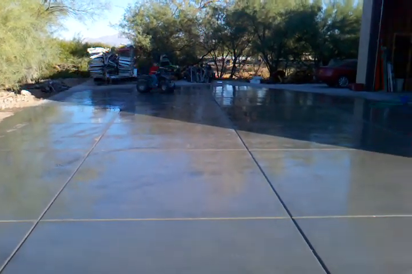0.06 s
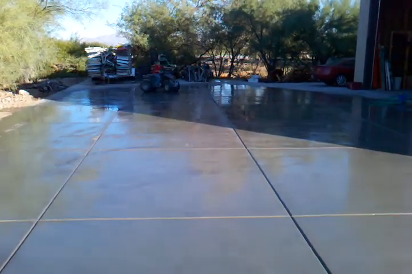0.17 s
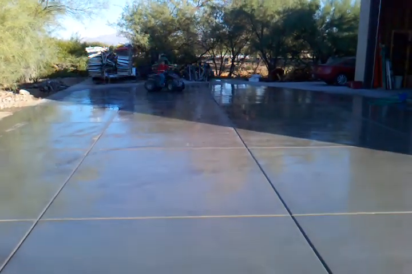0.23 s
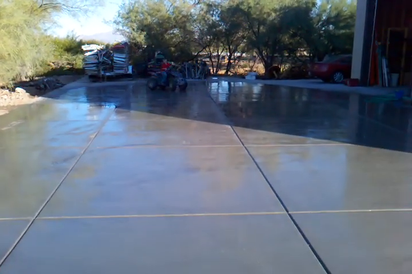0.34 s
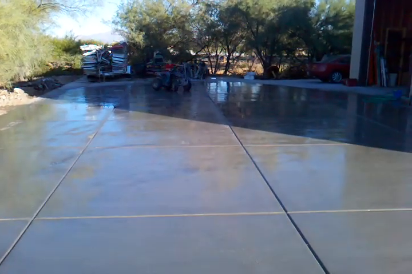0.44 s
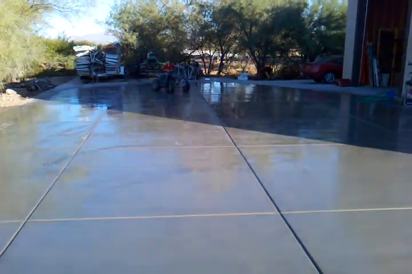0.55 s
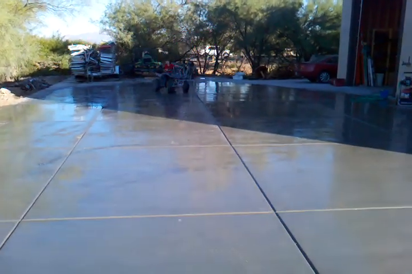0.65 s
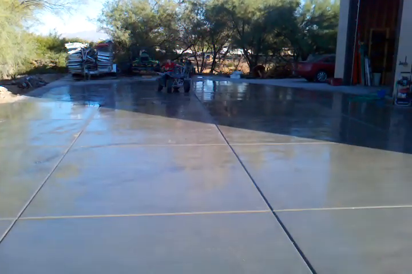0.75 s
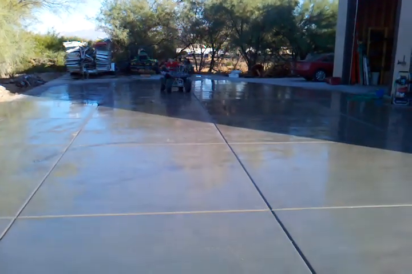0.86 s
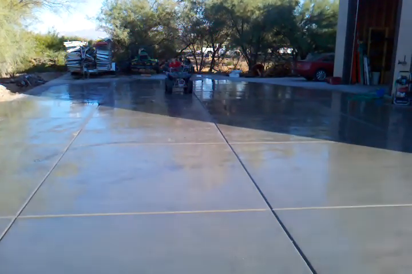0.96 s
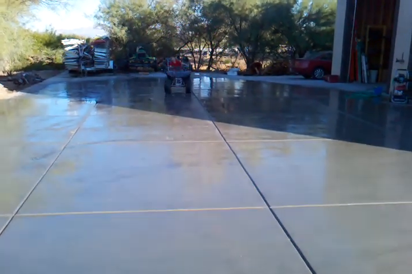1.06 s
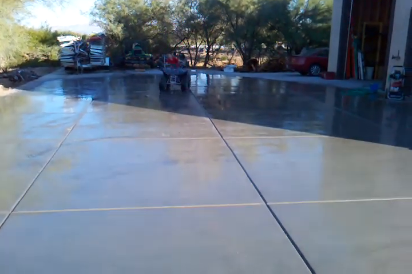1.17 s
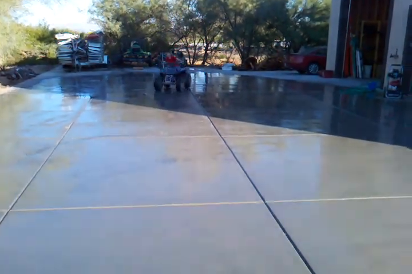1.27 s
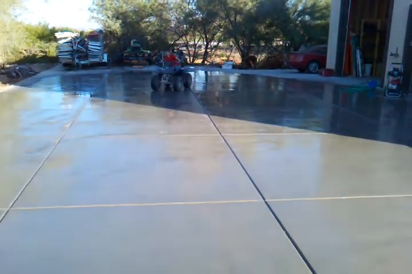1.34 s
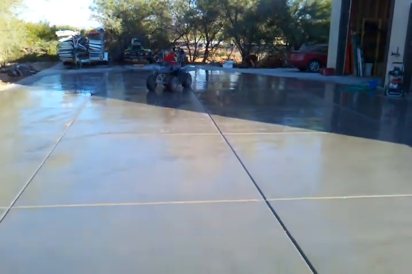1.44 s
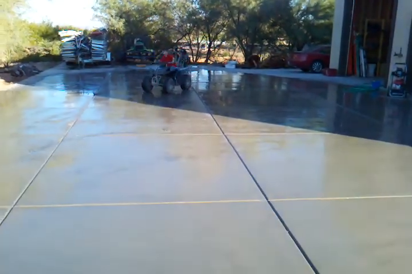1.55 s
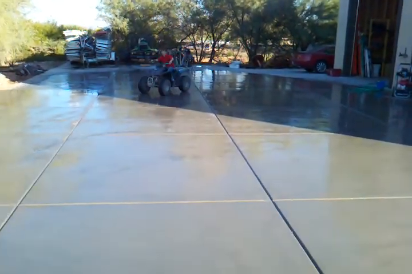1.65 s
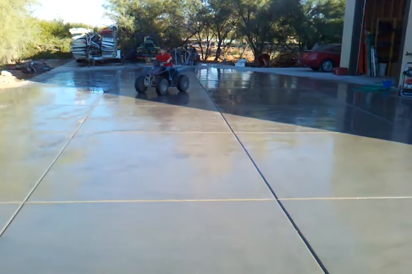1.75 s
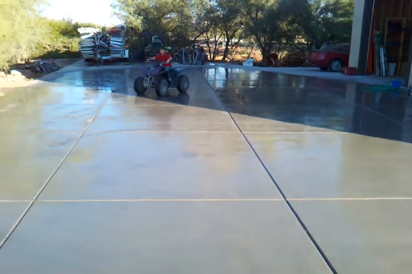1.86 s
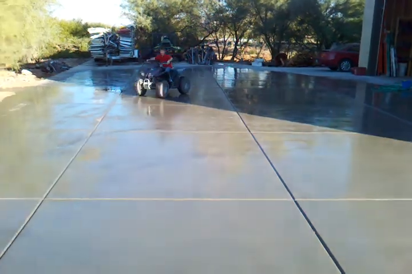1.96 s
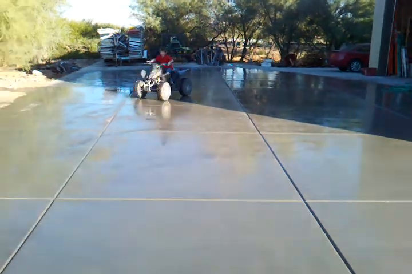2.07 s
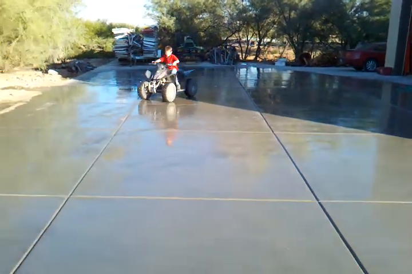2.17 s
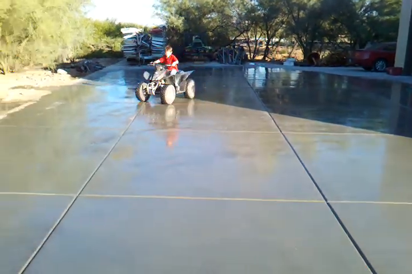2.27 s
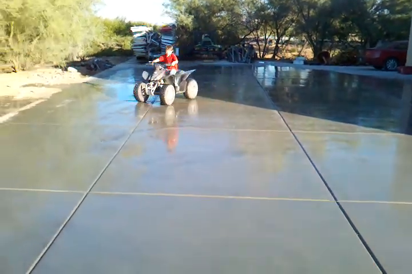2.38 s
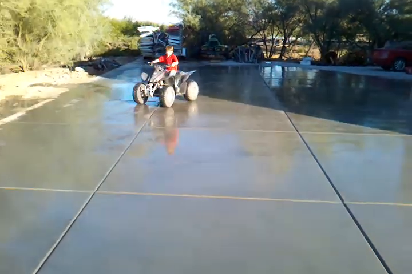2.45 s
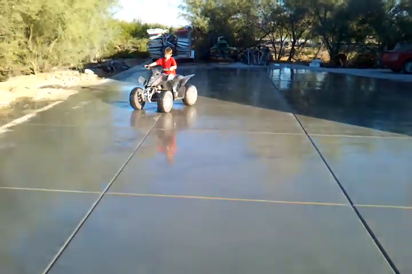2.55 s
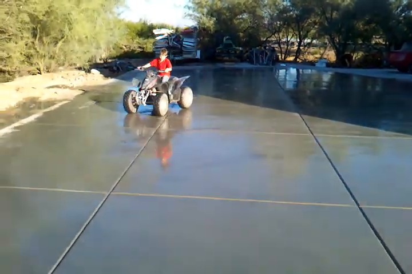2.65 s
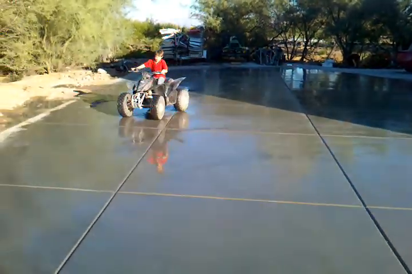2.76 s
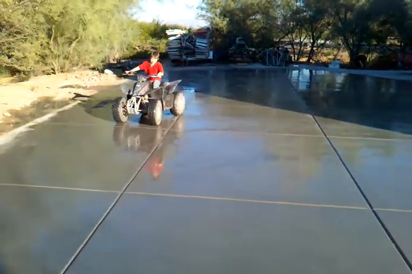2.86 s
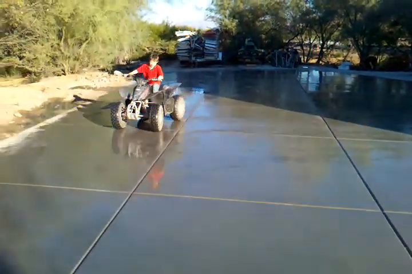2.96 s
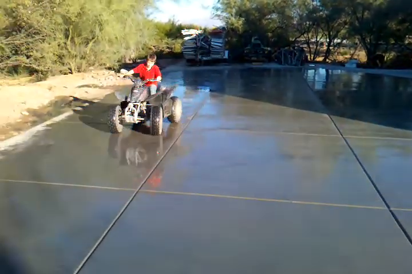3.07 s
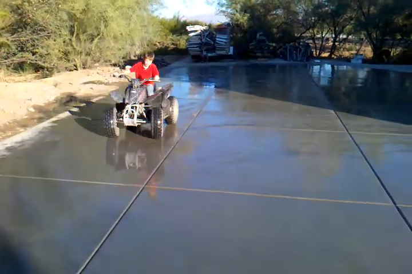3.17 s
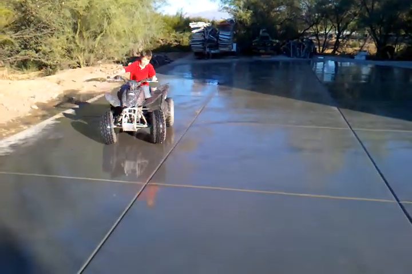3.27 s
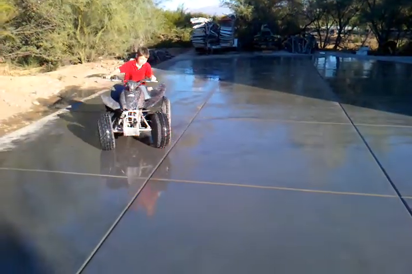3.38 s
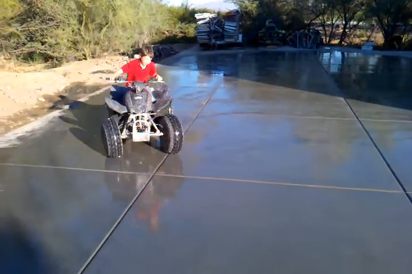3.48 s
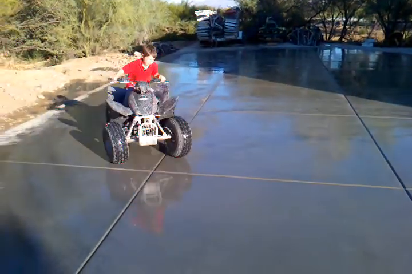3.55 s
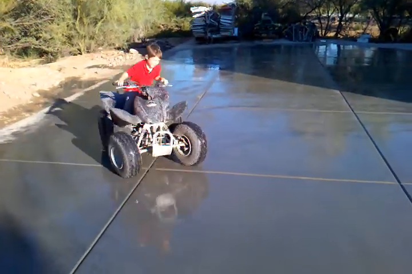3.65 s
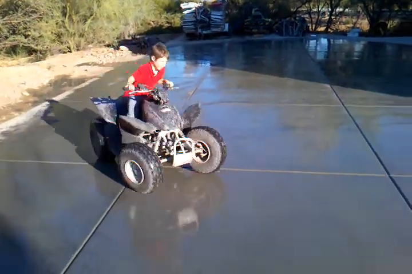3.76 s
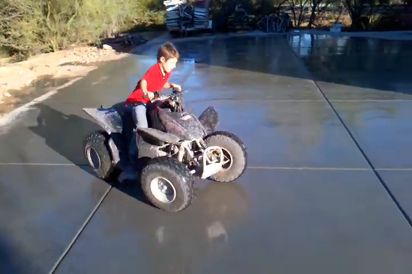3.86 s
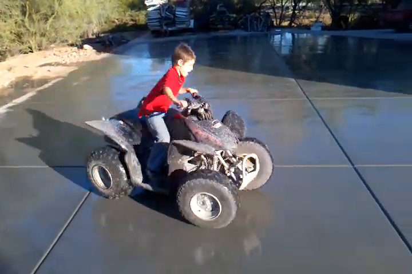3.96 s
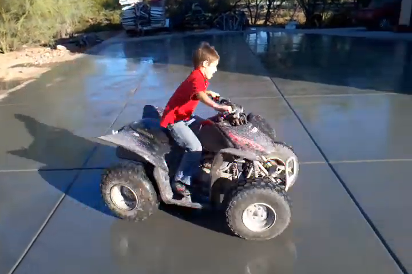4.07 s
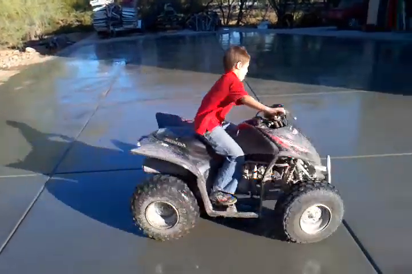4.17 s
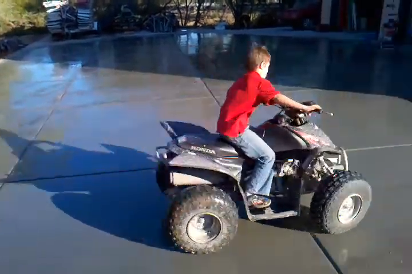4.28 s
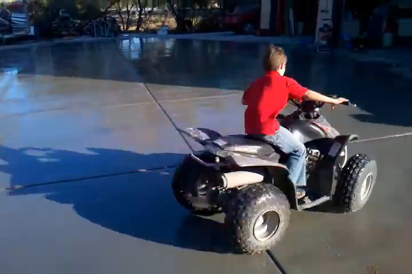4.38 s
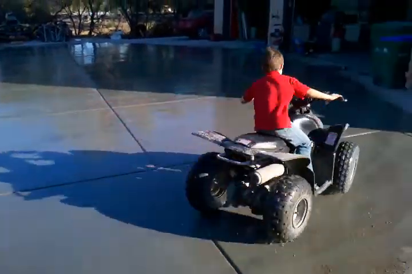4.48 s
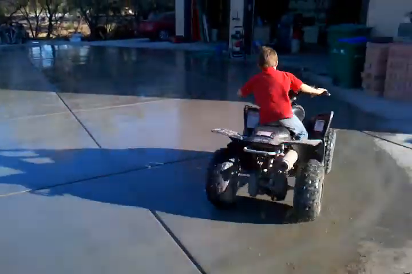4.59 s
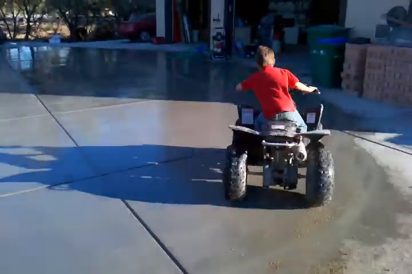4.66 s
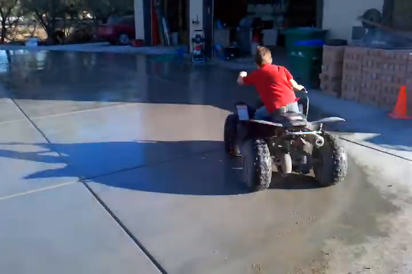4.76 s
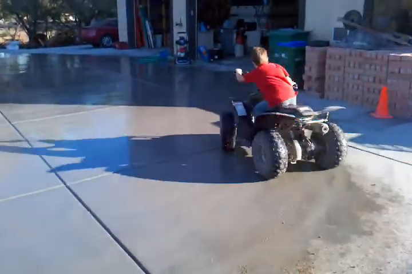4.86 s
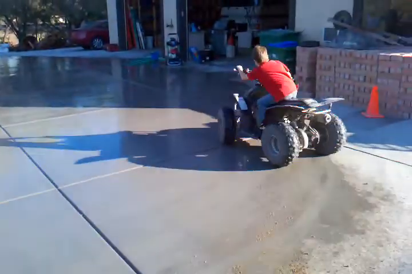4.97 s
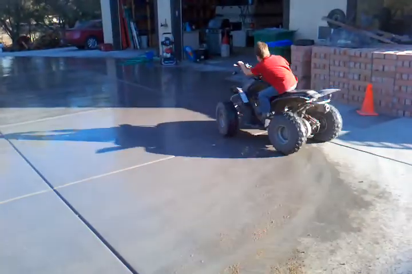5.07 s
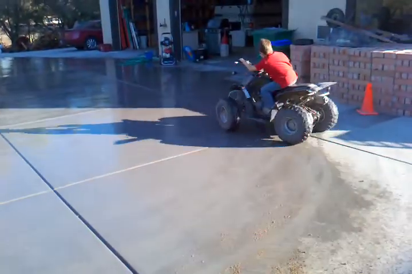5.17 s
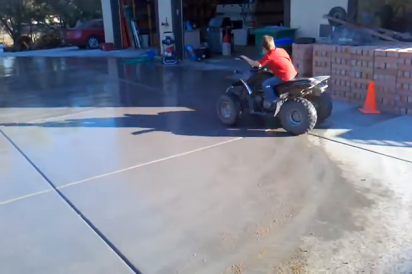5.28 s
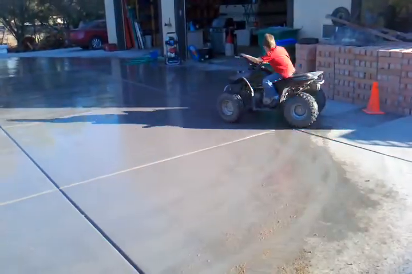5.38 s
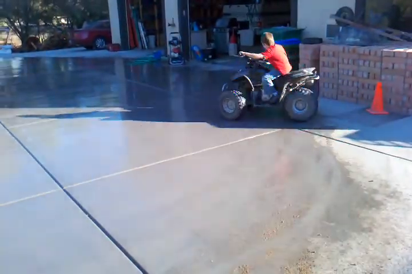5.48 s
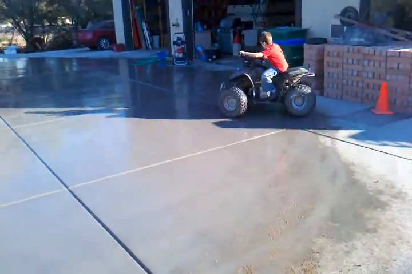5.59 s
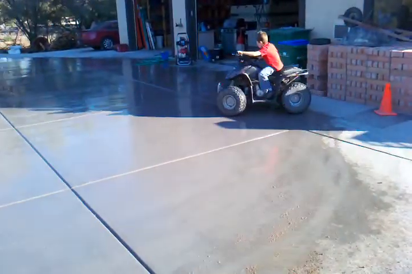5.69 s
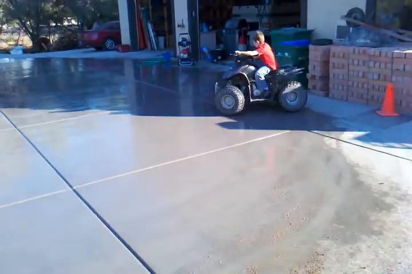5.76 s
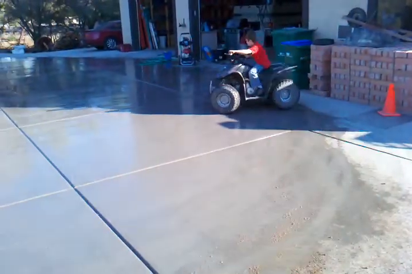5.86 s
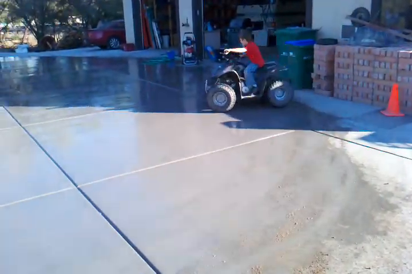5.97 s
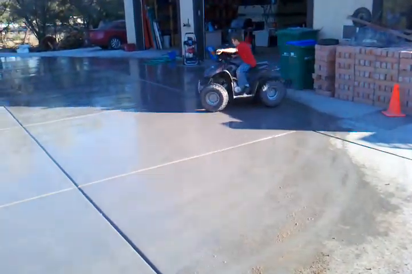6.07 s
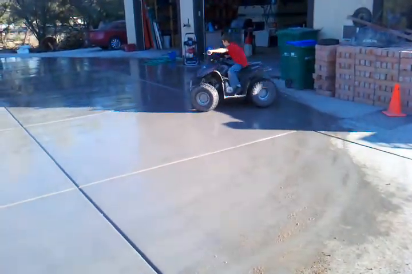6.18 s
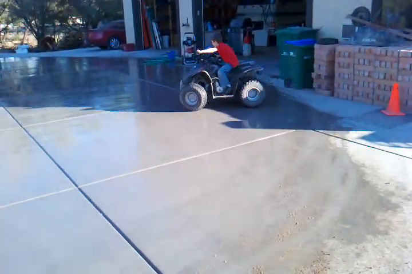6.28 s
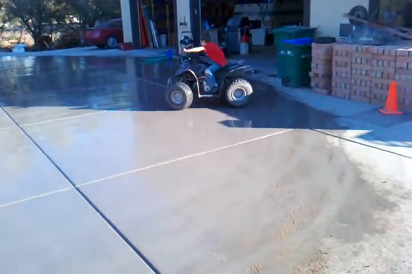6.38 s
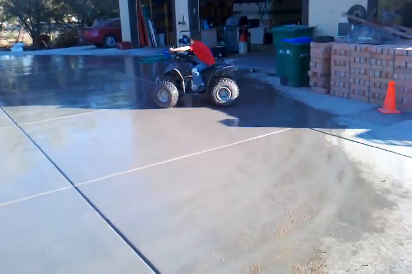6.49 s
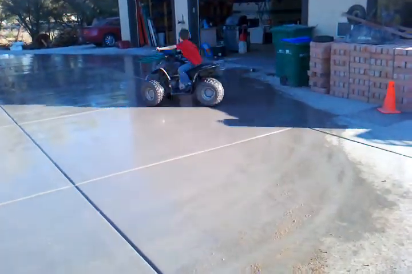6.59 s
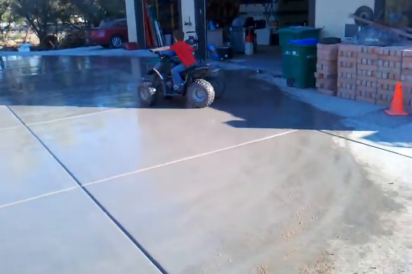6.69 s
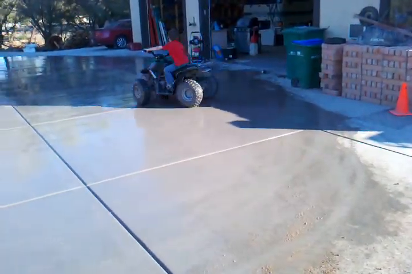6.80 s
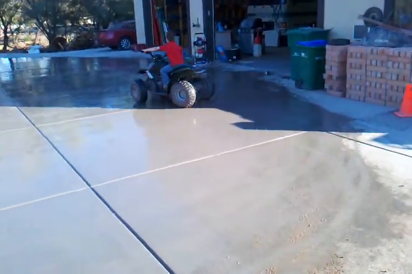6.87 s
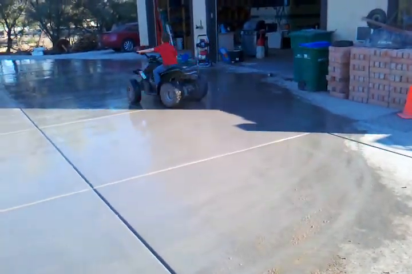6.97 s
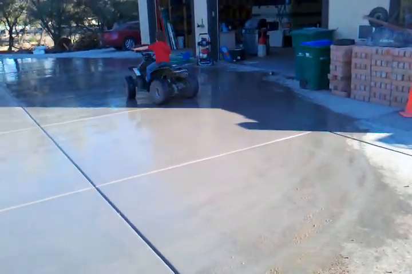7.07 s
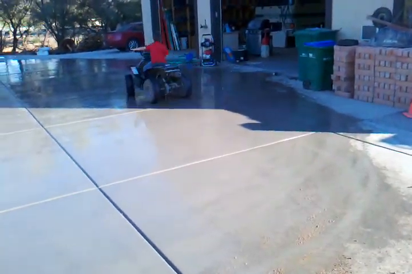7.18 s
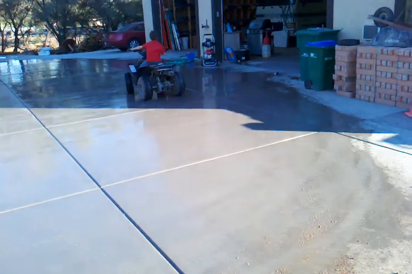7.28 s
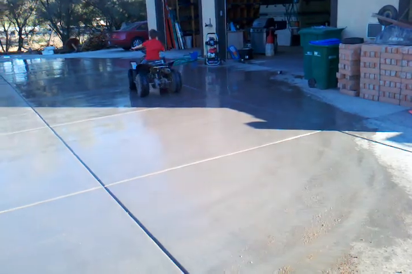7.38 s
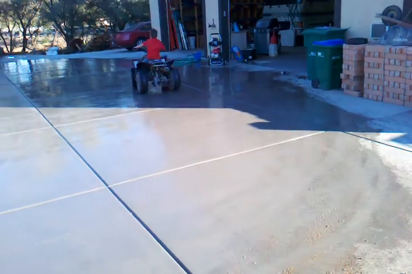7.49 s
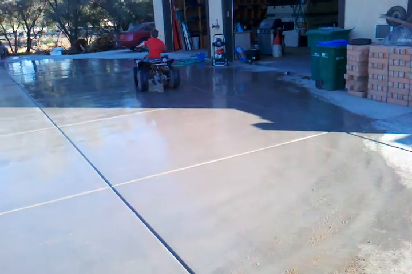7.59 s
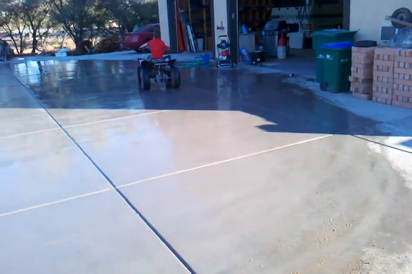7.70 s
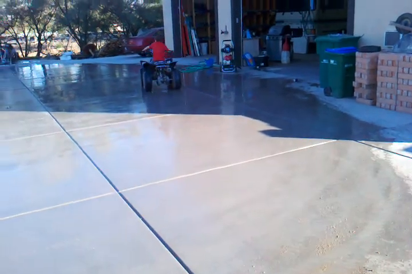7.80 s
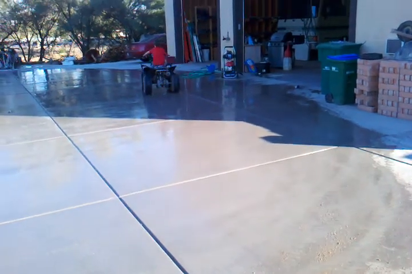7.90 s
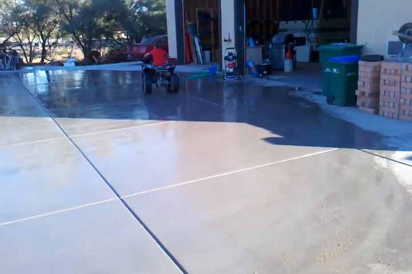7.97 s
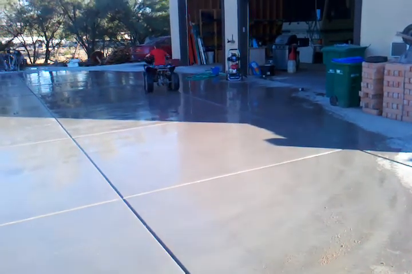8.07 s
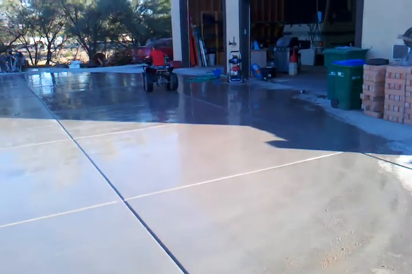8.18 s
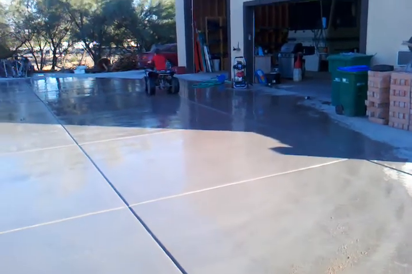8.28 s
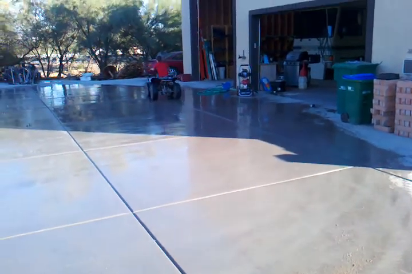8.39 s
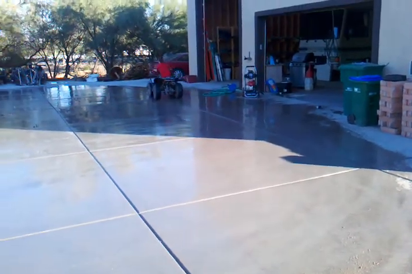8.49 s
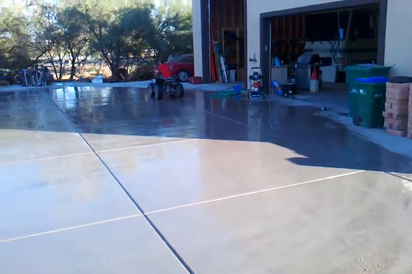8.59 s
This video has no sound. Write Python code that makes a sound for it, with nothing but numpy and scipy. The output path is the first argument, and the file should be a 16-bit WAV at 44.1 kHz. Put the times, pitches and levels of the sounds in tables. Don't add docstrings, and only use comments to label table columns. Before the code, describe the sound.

Outdoor handheld capture of a little four-stroke quad: distant buzzing engine, loud clattering close pass, drop to slow popping, then throttle building again as it leaves.

```python
import sys
import numpy as np
from scipy import signal
from scipy.io import wavfile
from scipy.ndimage import uniform_filter1d, map_coordinates

SR = 44100
rng = np.random.default_rng(int(sys.argv[2]) if len(sys.argv) > 2 else 0)


def amplitude_ratio(level_db):
    exponent = np.asarray(level_db, float) / 20
    return 10 ** exponent


def pcm_store(signal):
    levels = np.round(np.clip(np.atleast_2d(signal), -1, 1) * 32767)
    wavfile.write(sys.argv[1], SR, levels.astype(np.int16).T)


N = 381024

COARSE_S = np.arange(0, N + 40, 40) / SR
CROSS_FEED, CROSS_LAG = .97, 15
MIDDLE_PER_S = 45
CREST_MS = 4.556


def in_time(rows):
    s, *columns = np.transpose(rows)
    return [np.interp(np.arange(N) / SR, s, column) for column in columns]


def hump(s, length_s):
    return np.exp(-.5 * ((COARSE_S - s) / (length_s / 2)) ** 2)


def fine(x):
    return np.interp(np.arange(N) / SR, COARSE_S, x)


def drift(rate):
    r = np.exp(-80 * np.pi * rate / SR)
    slow = signal.lfilter([1], [1, -2 * r, r * r], rng.standard_normal(N // 40 + 2002))[2000:]
    return np.interp(np.arange(N) / 40, np.arange(len(slow)), slow / slow.std())


def cut(x, hz, kind, order=2):
    return signal.sosfilt(signal.butter(order, hz, kind, fs=SR, output="sos"), x)


def high_without_delay(x, hz):
    return signal.sosfiltfilt(signal.butter(2, hz, "high", fs=SR, output="sos"), x)


def resonate(x, modes):
    out = 0
    for k, (hz, width_hz, db) in enumerate(modes):
        r = np.exp(-np.pi * width_hz / SR)
        poles = [1, -2 * r * np.cos(2 * np.pi * hz / SR), r * r]
        out = out + (-1) ** k * amplitude_ratio(db) * signal.lfilter([1 - r * r, 0, r * r - 1], poles, x)
    return out


def heard_as_one(x):
    left = x[CROSS_LAG:] - CROSS_FEED * x[:-CROSS_LAG]
    return x / np.sqrt(np.mean(left ** 2))


def seen(rule, view, per_s):
    return np.interp(view, range(3), rule[:3]) + rule[3] * (per_s - MIDDLE_PER_S)


def wind():
    # middle_s, level_db, port (1 left, -1 right), swing_hz
    puffs = [(0.247, -16, 1, 180), (0.267, -12, 1, 283), (0.277, -12, 1, 198), (0.293, -25, 1, 210),
             (0.311, -6, 1, 148), (0.338, -21, 1, 160), (0.346, -13, -1, 250), (0.396, -18, 1, 150),
             (0.422, -17, 1, 200), (0.438, -22, -1, 200), (0.448, -2, -1, 190), (0.467, -12, 1, 205),
             (0.745, -16.5, 1, 164), (0.845, -10.5, -1, 260), (0.856, -4, -1, 200), (0.875, -16, 1, 160),
             (0.929, -5, 1, 186), (0.939, -7, 1, 200), (0.953, -8, -1, 180), (0.966, -13, 1, 180),
             (0.978, -3, -1, 182), (0.994, 4, -1, 210), (1.007, -10, 1, 230), (1.026, -7, 1, 230),
             (1.036, -5, 1, 240), (1.045, -3, 1, 283), (1.06, -3.5, -1, 200), (1.072, -13, -1, 160),
             (1.088, -13, -1, 190), (1.103, -18, 1, 178), (1.12, -11, -1, 270), (1.139, -16, 1, 270),
             (1.167, -18, 1, 268), (1.179, -7, 1, 298), (1.229, -14.5, 1, 220), (1.319, -15.5, 1, 207),
             (1.414, -10, -1, 215), (2.216, -17.5, -1, 180), (2.424, -17, 1, 190), (3.325, -11, -1, 310),
             (5.035, -13, -1, 150), (5.191, -17, -1, 140), (5.231, -15, -1, 160), (5.24, -12.5, -1, 149),
             (5.911, -14, 1, 180), (7.398, -17, -1, 130), (7.663, -14, 1, 230), (8.474, -16, -1, 150)]
    # start_s, length_s, level_db, port (1 left, -1 right; not used here)
    gusts = [(0.082, 0.19, -21, 1), (.25, 0.094, -9, 1), (0.391, 0.085, -9.5, -1), (.84, 0.025, -11.5, 1),
             (.92, 0.16, -2, -1), (1.22, 0.076, -29, -1), (1.82, 0.1, -24, 1), (3.269, 0.12, -19, -1),
             (4.39, 0.063, -16, -1), (4.93, 0.21, -28, -1), (5.18, 0.28, -28, 1), (5.77, 0.073, -40, -1),
             (8.46, 0.11, -24, 1)]
    eddy_turns = 0.33
    calm_db, rumble_db = -45, -21
    eddies = np.zeros((2, N))
    rough = cut(cut(rng.standard_normal(N), 300, "low"), 280, "high")
    near = np.arange(-1500, 1500)
    t = near / SR
    for s, db, port, hz in puffs:
        i = np.clip(round(s * SR) + near, 0, N - 1)
        swing = np.cos(2 * np.pi * hz * t) + 0.2 * rough[i] / rough.std()
        eddies[int(port < 0), i] += amplitude_ratio(db + 1.5) * np.exp(-.5 * (t * hz / eddy_turns) ** 2) * swing
    swells = sum(amplitude_ratio(db + rumble_db) * hump(s + length_s / 2, 0.86 * length_s)
                 for s, length_s, db, _ in gusts)
    breeze = amplitude_ratio(calm_db) + fine(swells)
    rumble = cut(cut(rng.standard_normal((2, N)), [90, 300], "band"), 12, "high")
    lumps = breeze * amplitude_ratio(5.4 * np.array([drift(17.0), drift(34)]))
    pushed = eddies + lumps * rumble / rumble.std()
    return cut(.5 * np.tanh(pushed / .5), [60, 650], "band")


def yard(x):
    # delay_s, level_db
    echoes = [(.023, -18.5), (.047, -14.5)]
    out = x.copy()
    for delay_s, db in echoes:
        lag = int(delay_s * SR)
        out[lag:] += amplitude_ratio(db) * x[:-lag]
    return out


def shadowed(x, notch_hz, share):
    late = np.interp(np.arange(N) - SR / (2 * notch_hz), np.arange(N), x)
    return (x + share * late) / np.sqrt(1 + share ** 2)


def at_ports(x, lag):
    low = cut(x, 5200, "low", order=1)
    sides = [map_coordinates(low, [np.arange(N) + side * lag / 2], order=1) for side in (1, -1)]
    return x - low + np.array(sides)


def chimes():
    # middle_s, length_s, pitch_hz, level_db
    rings = [(3.62, 0.063, 3683, -44), (3.9, 0.11, 1607, -34.5), (3.937, 0.074, 1433, -34.5),
             (3.95, .08, 1966, -39), (4.1, 0.086, 1360, -32), (4.114, 0.039, 4000, -35),
             (4.12, 0.089, 2020, -37), (4.135, 0.067, 766, -36), (4.137, 0.072, 1050, -30.5),
             (4.27, .07, 4600, -43), (4.284, 0.06, 1825, -34), (4.35, .07, 4750, -43),
             (4.43, 0.048, 1543, -34), (4.61, 0.076, 880, -38), (4.728, 0.049, 1560, -36),
             (5.06, 0.043, 1132, -39.5), (5.37, .07, 900, -39.5), (6.69, 0.06, 814, -40),
             (7.485, .08, 840, -37.5), (8.106, 0.15, 652, -39)]
    out, waver = np.zeros(N), amplitude_ratio(3.3 * drift(25.0))
    for s, length_s, hz, db in rings:
        i = np.arange(int((s - 2 * length_s) * SR), int((s + 2 * length_s) * SR))
        swell = np.exp(-.5 * ((i / SR - s) / (length_s / 2)) ** 2)
        out[i] += amplitude_ratio(db) * swell * np.sin(2 * np.pi * hz * i / SR)
    return out * waver


def casing(rattle_db):
    # pitch_hz, width_hz, level_db
    modes = [(766, 27, 6.5), (1050, 27, 4.5), (1313, 45, -3.5), (1429, 47, -7), (1535, 11, -1.5),
             (1626, 44, 4), (1772, 33, -4), (2260, 46, -6), (3860, 81, -1), (4400, 56, -11),
             (6900, 120, -26), (7470, 110, -18)]
    white = rng.standard_normal(N)
    rings = 0
    for mode in modes:
        fits = amplitude_ratio(6 * drift(3.1))
        rings = rings + fits * resonate(white, [mode]) / np.sqrt(mode[1])
    return amplitude_ratio(rattle_db - 12) * heard_as_one(rings)


def machine(cycles, view, load, rattle_db, hiss_db, patchy_db):
    # pitch_hz, front_db, side_db, rear_db, difference_between_ports_db
    colour = [(356.4, 10.5, 8.5, 9.5, -43), (433, 3.5, -11.5, 0.5, -4), (718, 6, 5.5, 3.5, -12.5),
              (1140, -5.5, 4.5, -4.5, -4.5), (1410, -3, 0.5, -5.5, -16), (1724, -6.5, 4, -3.5, -3),
              (2430, -10, -0.5, -9.5, -3.5), (3390, -22, -7.5, -17.5, -2), (4670, -17, -23, -20.5, -3.5),
              (4960, -20, -14, -20.5, -3.5), (7730, -22.5, -10.5, -20, 1.5), (8600, -20.5, -16.5, -22, 0),
              (10200, -22, -13, -22, 0.5), (12100, -31, -19, -27, 0), (13700, -31.5, -16.5, -31.5, -1.5)]
    # middle_s, length_s, pitch_hz, change_db
    glints = [(.15, 0.25, 960, 7.5), (0.12, 0.33, 620, 7.5), (0.27, 1, 4200, -8.5),
              (0.23, 0.98, 14000, -3.5), (1, 0.36, 2900, 2.5), (2.2, .5, 1700, -5), (3.6, 0.65, 2800, -10),
              (2.8, 0.62, 1700, 3.5), (2.8, 0.73, 9900, 8), (4.1, 0.72, 7200, -3), (4.2, 0.78, 1400, 3),
              (4.13, 0.73, 4660, 6.5), (4.8, 0.57, 2240, 4.5), (5.4, 0.37, 1400, -2), (5.75, 0.29, 810, 8),
              (5.8, 0.16, 1860, 6), (5.8, .6, 4600, -8), (4.9, 0.86, 7200, 2), (6.7, 1, 3600, -3.5),
              (7.0, 0.55, 4700, 4), (6.4, .4, 1400, -2), (7.8, 0.46, 820, -2.5), (8.45, 0.58, 647, 9.5),
              (3.8, .25, 1330, -2.5), (3.72, 0.31, 1070, 3), (8.15, .3, 1100, -3), (4.28, 0.17, 7100, 2.5),
              (2.6, .5, 7800, -4), (9.5, 0.42, 2100, 9), (3.07, 0.26, 3600, 4.5), (3.56, .25, 6000, -6),
              (5.37, .12, 980, 4.5), (4, .15, 1250, 2), (7, .3, 9100, 1)]
    glint_octaves = 0.13
    beat = np.exp(-(cycles % 1) / .1)
    beat = np.clip(load, 0, 1) * (beat - beat.mean())
    hz, *by_view_db, unlike_db = np.transpose(colour)
    white, shake = cut(rng.standard_normal((2, 2, N)), 63, "high"), drift(40.0)
    edges = 80 * 2 ** np.arange(0, 7.7, 1 / 3)
    rattle, hiss = 0, 0
    for k, (low, high) in enumerate(zip(edges, edges[1:])):
        at = np.log(low * high) / 2
        seen_db = np.interp(view, range(3), [np.interp(at, np.log(hz), c) for c in by_view_db])
        glint_db = 0
        for s, length_s, glint_hz, db in glints:
            octaves = (at - np.log(glint_hz)) / np.log(2)
            glint_db = glint_db + db * hump(s, length_s) * np.exp(-.5 * (octaves / glint_octaves) ** 2)
        gain = amplitude_ratio(seen_db + fine(glint_db) + patchy_db * drift(10.0) + 1.71 * drift(19.3))
        unlike = amplitude_ratio(np.interp(at, np.log(hz), unlike_db))
        band = gain * cut(white[k % 2], [low, high], "band") * [[1], [unlike]]
        if low < 2800:
            rattle = rattle + band
        else:
            hiss = hiss + band
    scale = [np.std(heard_as_one(x[0])) / np.std(x[0]) for x in (rattle, hiss)]
    rattle = amplitude_ratio(rattle_db - 1.33 + 0.57 * shake) * scale[0] * (1 + 3.2 * beat) * rattle
    hiss = amplitude_ratio(hiss_db + 0.5 * shake) * scale[1] * (1 + 2.0 * beat) * hiss
    direct, scattered = rattle + hiss
    return direct, scattered


def panels(cycles):
    # middle_s, length_s, multiple_of_firing_rate, level_db
    sings = [(0.11, 0.14, 4, -45), (0.67, 0.16, 5, -40), (0.83, 0.44, 7, -45.5), (1.77, 0.31, 5, -49.5),
             (2.1, 0.086, 6, -56), (2.2, 0.12, 7, -50), (2.367, 0.11, 8, -43.5), (2.75, 0.24, 8, -41.5),
             (3.08, 0.091, 7, -38.5), (3.616, 0.37, 3, -37.5), (3.542, 0.21, 5, -37),
             (3.797, 0.25, 5, -33.5), (3.953, 0.5, 4, -37), (4.257, 0.28, 6, -38.5),
             (4.617, 0.11, 3, -38.5), (4.62, 0.18, 4, -32.5), (4.8, 0.057, 3, -30.5), (4.8, 0.066, 4, -34),
             (4.705, 0.1, 5, -44), (5.2, 0.29, 4, -40), (5.03, 0.39, 5, -34.5), (5.03, 0.29, 6, -44),
             (5.26, 0.1, 3, -38), (5.36, 0.12, 4, -43), (5.335, 0.069, 8, -41.5), (5.66, 0.22, 3, -49),
             (5.812, 0.18, 4, -49.5), (6.08, 0.18, 4, -59), (7.16, 0.18, 4, -39.5), (8.297, 0.29, 4, -40),
             (0.27, 0.056, 3, -43), (1.91, 0.061, 3, -47), (3.76, 0.13, 6, -42.5), (3.603, 0.25, 7, -40.5),
             (3.9, .16, 9, -49), (4.528, 0.093, 2, -46), (6.6, 0.18, 9, -37), (6.778, 0.17, 10, -35),
             (7.196, 0.29, 8, -38), (7.742, 0.2, 10, -37.5), (2.25, .16, 14, -51.5), (7.4, .16, 11, -40.5),
             (3.13, .14, 11, -44), (3.058, 0.13, 15, -45), (7.3, 0.27, 4, -35.5), (6.78, .26, 5, -33),
             (3.2, 0.12, 5, -42), (5.26, .1, 4, -42), (6.403, 0.18, 16, -39), (0.76, 0.41, 14, -47),
             (5.07, 0.22, 8, -38)]
    bass_makeup = 13.9
    out = 0
    for line in {round(row[2]) for row in sings}:
        swell = sum(amplitude_ratio(db) * hump(s, length_s) for s, length_s, k, db in sings if round(k) == line)
        out = out + fine(swell) * np.sin(2 * np.pi * line * cycles + 0.51) * bass_makeup / line
    return out


def crank(cycles, hum_db, octave_db):
    # multiple_of_turn, level_db
    whirr = [(3.5, -9), (4, -8), (4.5, -12), (5, -11)]
    turn = 4 * np.pi * cycles
    hum = heard_as_one(np.sin(turn))
    for k, db in whirr:
        hum = hum + amplitude_ratio(db) * heard_as_one(np.sin(k * turn + k * k))
    octave = heard_as_one(np.sin(2 * turn + 0.5))
    return amplitude_ratio(hum_db) * hum + amplitude_ratio(octave_db + 1.2 * drift(4.5)) * octave


def exhaust(cycles, per_s, boom_db, drum_db, bark_db, crack_db, uneven_db, jitter_ms):
    # pitch_hz, width_hz, level_db
    silencer = [(109, 240, -3), (138.6, 11.5, 13)]
    # pitch_hz, width_hz, level_db
    air_box = [(203, 69, 0)]
    # pitch_hz, width_hz, level_db
    slam_modes = [(660, 170, 3.5), (975, 210, -2.5), (1675, 123, 2), (1850, 195, 2.5), (2460, 100, 2),
                  (4170, 330, -5.5)]
    pipe_hz = 239
    valve_open_ms, valve_follows = 7.07, 0.25
    at = np.flatnonzero(np.diff(np.floor(cycles)))
    chance = rng.standard_normal((len(at), 3))
    pulses, slams, bark = np.full((3, N), 1e-18)
    late = np.clip(at + (chance[:, 1] * jitter_ms * SR / 1000).astype(int), 200, N - 700)
    crest = late + round(CREST_MS * SR / 1000)
    pulses[late] = amplitude_ratio(uneven_db * chance[:, 0]) / np.sqrt(per_s[at])
    slams[crest - 60] = pulses[late] * amplitude_ratio(1.3 * chance[:, 2])
    boom = cut(resonate(pulses, silencer), [85, 175], "band")
    drum = cut(resonate(-pulses, air_box), [140, 240], "band")
    near = np.arange(-350, 350)
    open_s = valve_open_ms / 1000 * (MIDDLE_PER_S / per_s[at, None]) ** valve_follows
    opening = np.cos(np.pi * np.clip(near / SR / open_s, -.5, .5)) ** 2
    blow = opening * np.sin(2 * np.pi * pipe_hz * near / SR)
    np.add.at(bark, crest[:, None] + near, -pulses[late, None] * blow)
    bark = cut(bark, 35, "high")
    crack = cut(resonate(slams, slam_modes), 610, "high")
    parts = zip((boom_db + 8.5, drum_db + 4.5, bark_db - 0.5, crack_db), (boom, drum, bark, crack))
    return sum(amplitude_ratio(db) * heard_as_one(part) for db, part in parts)


def scene():
    # start_s, rattle_db (nearness), throttle (0-1), view (0 front, 1 side, 2 rear),
    # right_port_late_samples
    ride = [(0, -37.5, 0.74, 0.061, 2.5), (.3, -38, 0.5, 0.095, 1.7), (.95, -38, 0.36, 0.13, 0.2),
            (1.15, -42.5, 0.44, 0.23, -0.5), (1.95, -45, 0.68, 0.29, 1.3), (2.2, -40.5, 0.79, 0.086, 0.5),
            (2.85, -36, 0.58, 0.24, 0.7), (3.45, -30, 0.37, 0.4, 2.2), (3.95, -23.5, 0, 0.69, 0.3),
            (4.3, -24.5, 0.18, 0.87, -0.3), (4.6, -27.5, 0.29, 0.92, 0), (5.35, -29.5, 0.56, 1.02, -1.5),
            (5.5, -34, 0.64, 0.83, -1), (5.9, -32.5, 0.12, 1.36, -1), (6.13, -36, 0.23, 1.74, 0),
            (6.21, -35, 0.94, 2.05, -1.3), (6.32, -31, 0.86, 1.71, -0.2), (7, -30, 0.94, 1.6, 0.3),
            (8.64, -28, 0.67, 3.8, 0.3)]
    # start_s, firings_per_s
    speed = [(0, 35), (.11, 38.3), (.3, 43.8), (.44, 42.3), (.51, 40.7), (.79, 47.2), (.98, 51.8),
             (1.3, 50), (1.6, 43.2), (1.97, 36.4), (2.07, 37.3), (2.15, 40.6), (2.36, 41.7), (2.62, 44.3),
             (2.8, 46.6), (2.95, 47.6), (3.1, 49.8), (3.18, 50.2), (3.38, 47), (3.6, 52.4), (3.83, 57),
             (4.42, 60.2), (4.52, 55.9), (4.73, 50.2), (4.76, 48.2), (4.85, 47.4), (4.88, 45.6),
             (5.07, 46.2), (5.2, 45.2), (5.44, 36.6), (5.53, 33.2), (5.65, 28.9), (5.82, 25), (6.2, 21.2),
             (6.33, 24), (6.65, 25.3), (6.95, 30.2), (7.12, 32.5), (7.45, 35.3), (7.6, 35.8), (8.44, 48.3)]
    # middle_s, loss_db, length_s, sag_firings_per_s
    lifts = [
        (2.926, 1.5, 0.14, 2.1),
        (4.456, 3, 0.087, 0.25),
        (4.548, 2, 0.066, 0.3),
        (4.767, 0, 0.038, 0.32),
        (4.882, 3, 0.091, .3),
        (5.192, 2, 0.057, 0.3),
        (5.267, 3.0, 0.053, 0.32),
        (6.148, -0.5, 0.15, 0.2875),
        (8.562, 3.5, 0.14, 2.1),
    ]
    # start_s, first_notch_hz, echo_share,
    # silencer_db (as the pipe points)
    shadow = [(0, 94, 0.15, 8.5), (1.2, 100, 0.11, -6), (1.6, 140, 0.25, -9), (2.3, 144, 0.13, -11.5),
              (3.4, 142, 0.27, -0.5), (3.6, 205, 0.25, -8), (3.85, 231, 0.084, 7), (4.1, 288, 0.9, -11),
              (4.45, 277, 0.63, -3.5), (4.7, 320, 0.96, -8), (4.92, 138.8, 0.13, -8),
              (5.2, 198, 0.26, -8.5), (5.5, 142, 0.36, -6), (6.2, 148, 0.16, -2), (6.4, 170, 0.26, 3.5),
              (6.85, 182, 0.072, -0.5), (7.15, 182, 0.21, -5.5), (7.35, 175, 0.092, -7),
              (7.7, 143.7, 0.067, -0.5), (8.2, 136.6, 0.16, -25), (8.64, 140, 0.17, -0.5)]
    # front_db, side_db, rear_db,
    # db_per_firing_per_s above the middle speed
    boom_seen = (-24.5, -21.5, -27, 0.26)
    drum_seen = (-30, -24.5, -33, -0.06)
    bark_seen = (-19, -19, -18, 0.17)
    crack_seen = (-16.5, -11, -9, 0.18)
    hum_seen = (-25.5, -22, -20.5, 0.76)
    octave_seen = (-32.5, -25.5, -26, 0.29)

    per_s, = in_time(speed)
    slowing = np.clip(-uniform_filter1d(np.gradient(per_s) * SR, size=3000), 0, None)
    per_s = per_s - fine(sum(sag * hump(s, length_s) for s, _, length_s, sag in lifts))
    near_db, throttle, view, lag = in_time(ride)
    lift_db = fine(sum(loss_db * hump(s, length_s) for s, loss_db, length_s, _ in lifts))
    rattle_db = near_db - lift_db
    cycles = np.cumsum(per_s) / SR
    cycles = cycles - cycles[int(6.257 * SR)]
    load = 0.49 * (throttle - 0.31)
    _, notch_hz, share, aim_db = uniform_filter1d([per_s, *in_time(shadow)], size=2000)

    pulse_db = rattle_db + 20 * throttle - 0.37 * lift_db
    boom_db, drum_db, bark_db = (pulse_db + seen(rule, view, per_s)
                                 for rule in (boom_seen, drum_seen, bark_seen))
    overrun_db = 0.3451 * slowing * (per_s / MIDDLE_PER_S) ** 2
    boom_db = boom_db + 14.5 * (throttle - .65) + overrun_db + aim_db
    crack_db = rattle_db + seen(crack_seen, view, per_s) + 0.98 * load
    hum_db = near_db + throttle + seen(hum_seen, view, per_s)
    octave_db = pulse_db + seen(octave_seen, view, per_s)
    hiss_db = rattle_db - 4 + 0.14 * (near_db + 31.0)

    thump = yard(exhaust(cycles, per_s, boom_db, drum_db, bark_db, crack_db, uneven_db=0.7, jitter_ms=0.12))
    thump = shadowed(high_without_delay(thump, 91), notch_hz, np.clip(share, 0, 1))
    thump = thump + panels(cycles) * MIDDLE_PER_S / per_s * amplitude_ratio(-3.0 * lift_db)
    hum = crank(cycles, hum_db, octave_db) * amplitude_ratio(-0.2 * slowing)
    at_crest = cycles - per_s * CREST_MS / 1000
    direct, scattered = machine(at_crest, view, load, rattle_db, hiss_db, patchy_db=0.45)
    metal = at_ports(direct + casing(rattle_db) + chimes(), lag)
    return thump + hum + wind() + metal + scattered * [[1], [-1]]


def band_limit(x):
    return signal.sosfilt(signal.butter(12, 15270, fs=SR, output="sos"), x)


def record(dry):
    leak_centre, leak_difference, leak_hz = .55, .25, 4630
    dry = dry * amplitude_ratio([[.48], [-.48]])
    blur = np.exp(-.5 * (np.arange(-4, 5) / .8) ** 2)
    late = signal.lfilter(np.r_[np.zeros(CROSS_LAG - 4), blur / blur.sum()], [1], dry[::-1])
    centre = late.mean(axis=0)
    lost = leak_centre * centre + leak_difference * (late - centre)
    late = late - high_without_delay(lost, leak_hz)
    top_cut = signal.ellip(12, .5, 85, 13980, fs=SR, output="sos")
    wide = signal.sosfilt(top_cut, dry - CROSS_FEED * late)
    return band_limit(wide * amplitude_ratio([[-.6], [.6]]))


dry = scene()
out = record(dry)
pcm_store(out)
```